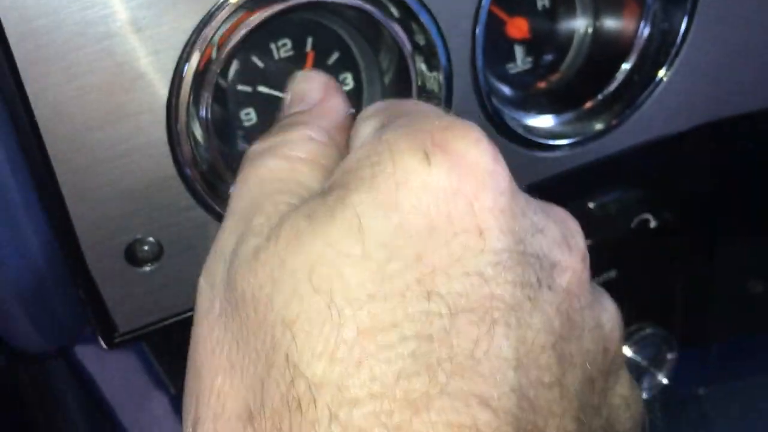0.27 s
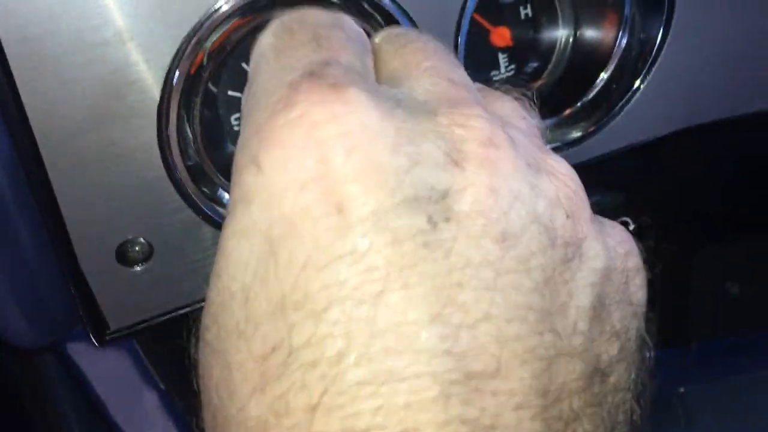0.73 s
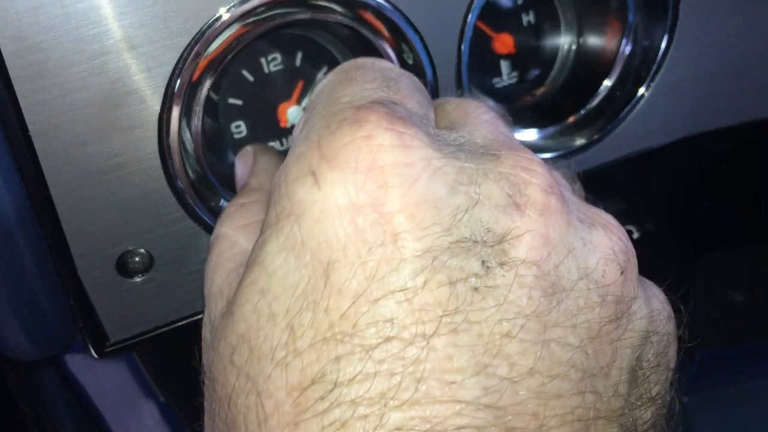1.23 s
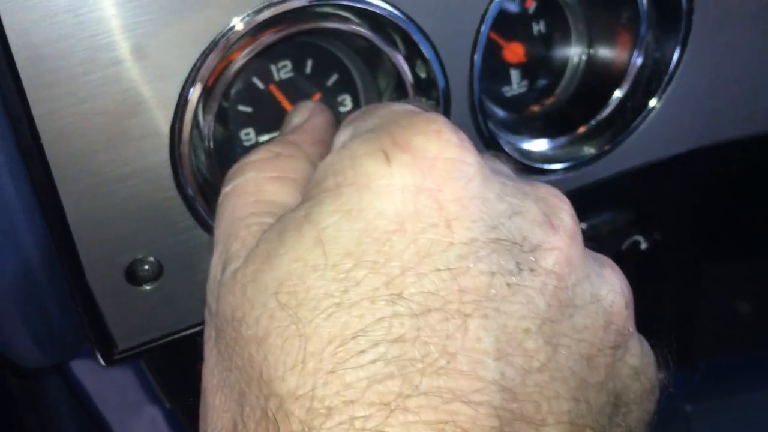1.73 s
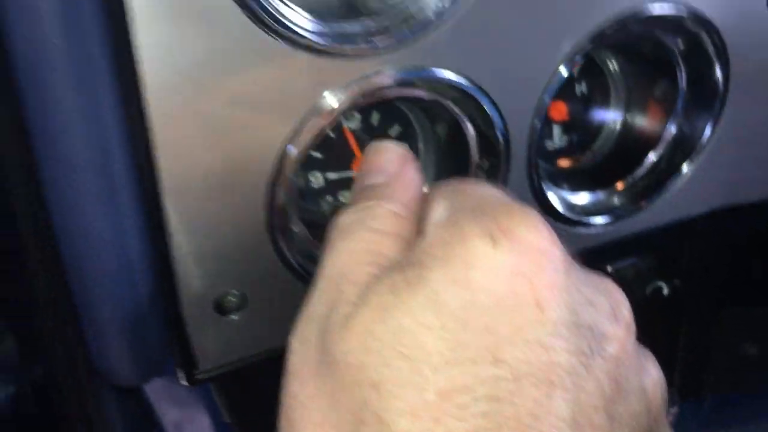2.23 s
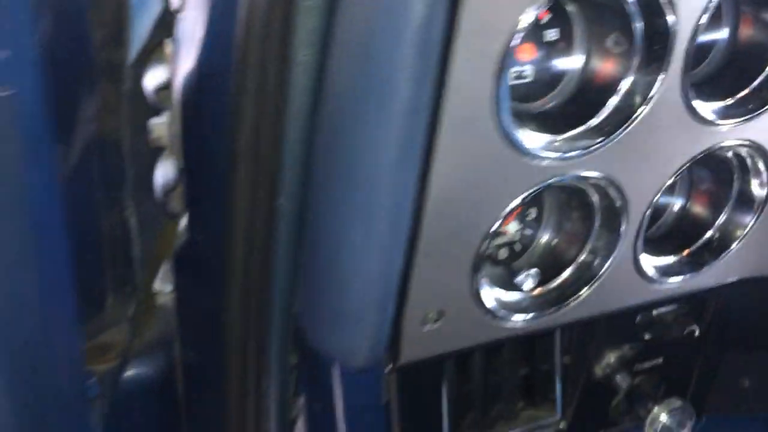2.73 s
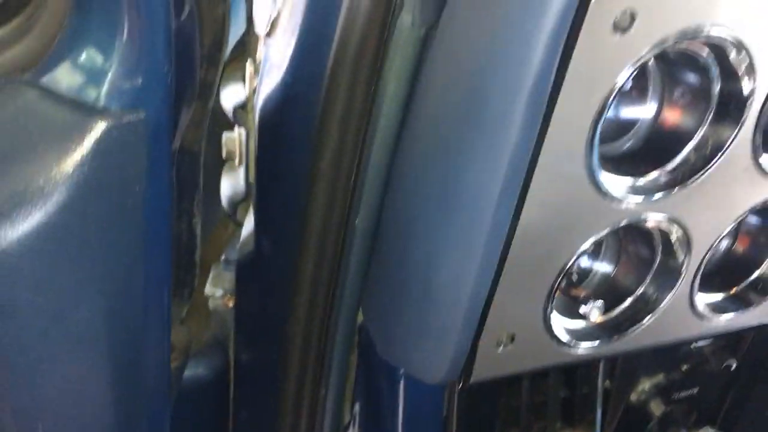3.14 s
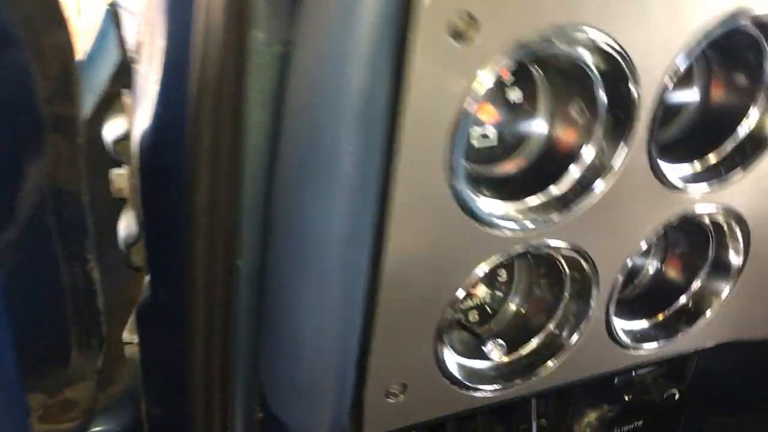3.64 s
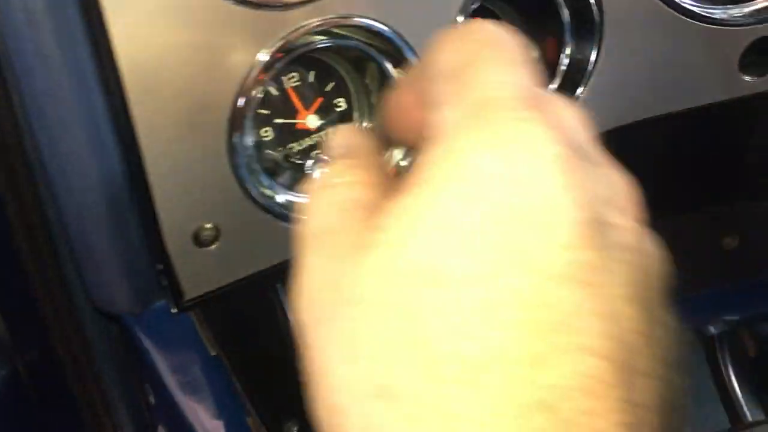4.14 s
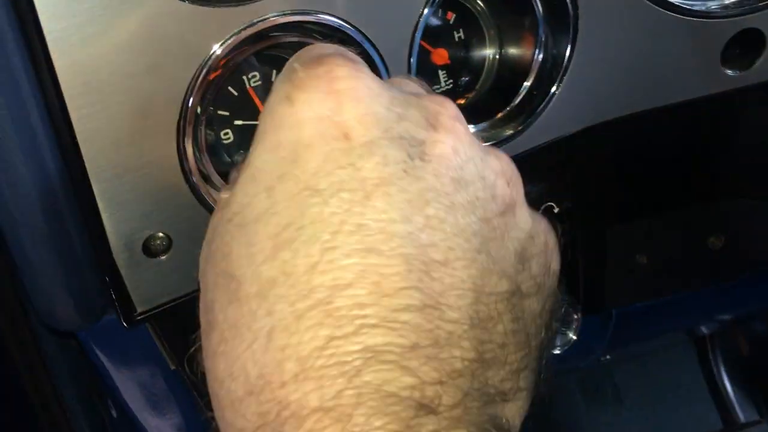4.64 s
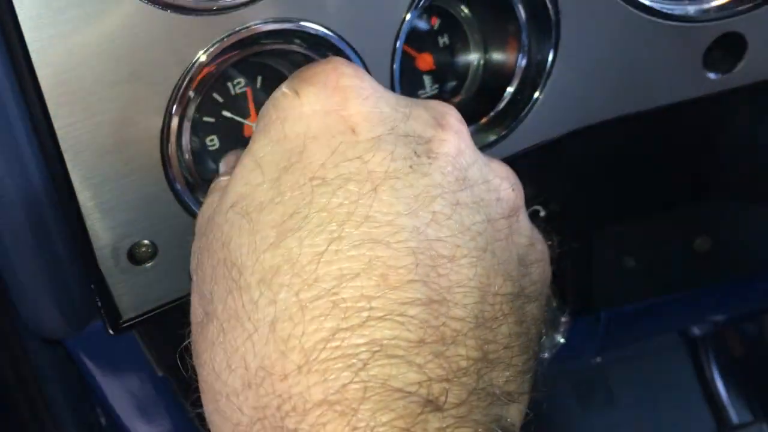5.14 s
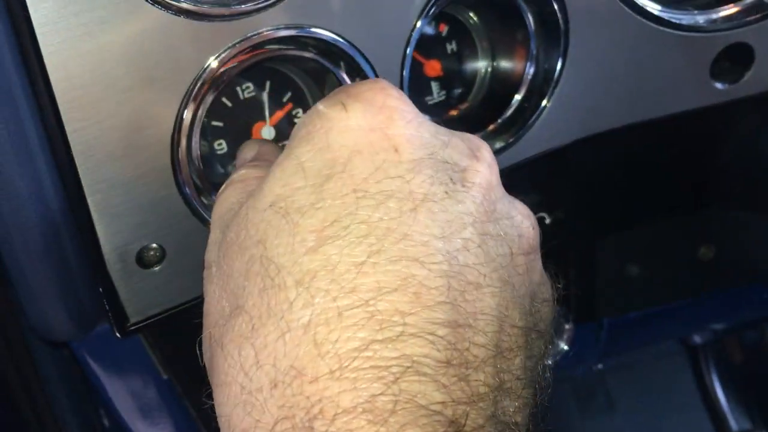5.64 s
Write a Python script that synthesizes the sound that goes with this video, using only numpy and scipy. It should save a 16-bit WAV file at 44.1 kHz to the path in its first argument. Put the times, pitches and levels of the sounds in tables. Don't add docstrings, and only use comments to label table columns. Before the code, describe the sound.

Inside a padded truck cab, a little sprung knob is pulled, turned and released a hand's width from the microphone. Two brutal clipped snaps, about two seconds apart, ring the metal panel and chrome rim, with scratchy twisting between them. Then mostly low rumble, soft hiss and rustling cloth, followed by a cluster of smaller clicks and fading scrapes.

```python
import sys
import numpy as np
from scipy import signal
from scipy.fft import rfft, irfft
from scipy.io import wavfile
from scipy.ndimage import uniform_filter1d

SR = 44100
rng = np.random.default_rng(int(sys.argv[2]) if len(sys.argv) > 2 else 0)


def volts_from_db(level):
    exponent = np.asarray(level, float) / 20
    return 10 ** exponent


def put_to_file(sound):
    columns = np.atleast_2d(sound).T
    safe = np.clip(columns, -1, 1)
    whole_steps = np.round(safe * 32767)
    wavfile.write(sys.argv[1], SR, whole_steps.astype(np.int16))


N = 259749
T = np.arange(N) / SR

# start_s [s], peak_db [dB], treble_db [dB], thud_db [dB], rattle_s [s]
SNAPS = [
    (0.3423, 8, 6.5, -13, 0.002),
    (2.2404, 8, 6, -13, 0.003),
    (4.685, -19, -20, -43.5, 0.0063),
    (4.8263, -14.5, -31.5, -23, 0.018),
    (4.9683, -17, -18.5, -29.5, 0.0092),
]
GRIT_DB = 1.3


def unit(x):
    return x / np.sqrt(np.mean(x ** 2))


def ring(x, modes):
    out = 0
    for k, (hz, db, t60) in enumerate(modes):
        r = np.exp(-np.log(1000) / (max(t60, .002) * SR))
        a = [1, -2 * r * np.cos(2 * np.pi * hz / SR), r * r]
        gain = (-1) ** k * volts_from_db(db) * np.sqrt((1 - r * r) / 2)
        out = out + gain * signal.lfilter([1, 0, -1], a, x)
    return out / np.sqrt(np.sum(volts_from_db([m[1] for m in modes]) ** 2))


def band(x, lo_hz, hi_hz):
    return signal.sosfilt(signal.butter(2, [lo_hz, hi_hz], "band", fs=SR, output="sos"), x)


def steady(x, hold_s):
    return x / np.sqrt(uniform_filter1d(x * x, int(hold_s * SR)) + 0.019)


def grit(spread_db):
    jumps = np.repeat(rng.exponential(size=N // 22 + 1), 22)[:N]
    return unit(rng.standard_normal(N) * volts_from_db(spread_db * jumps))


def judder(depth_db, hold_s):
    k = int(hold_s * SR)
    strength = np.repeat(rng.standard_normal(N // 100), k)[:N]
    return volts_from_db(depth_db * uniform_filter1d(strength, k // 2))


def swell(middle_s, length_s):
    return np.cos(np.pi * np.clip((T - middle_s) / length_s, -.5, .5)) ** 2


def struck(rattle_s, t60):
    t = T[:int(.25 * SR)]
    rise = np.minimum(t / .0003, 1)
    return rise * volts_from_db(-60 * np.maximum(t - rattle_s, 0) / max(t60, .005))


def add(track, start, x):
    track[start:start + len(x)] += x[:len(track) - start]


def cab_air():
    # pitch_hz [Hz], level_db [dB], t60_s [s]
    lengthwise = [(87.5, -7, 0.62), (102.4, 5, 0.87), (120.9, -6, 0.098)]
    crosswise = [(167.9, -2, 0.41), (184, 0, 0.49), (228.8, -10, 0.14)]
    seat_mode = [(41.95, -10, 0.61), (71.6, -12, .3)]
    upper_modes = [(252.4, 1, 0.079), (291.7, 2.5, 0.13), (352.9, -0.5, 0.377), (405, -10, 0.16)]
    # pitch_hz [Hz], level_db [dB], t60_s [s]
    mic_port = [(9600, 0, .002)]
    # pitch_hz [Hz], density_db [dB per Hz]
    hiss_curve = [(200, -18), (300, -11.5), (450, -7), (700, -9), (1200, -11), (2000, -17), (3200, -21.5),
                  (4900, -28), (6000, -25.5), (7800, -27.5), (11000, -28.5), (15400, -29)]
    # at_s [s], lean_db [dB]
    lean = [(0, 0), (.67, -1.5), (1.0, 6), (1.43, 7), (2.0, -6), (2.25, 2.5), (2.55, -4.5), (3.9, -1.5),
            (4.1, -1.5), (4.72, 4), (5.03, 6), (5.25, 1.5), (5.89, -2)]
    # middle_s [s], length_s [s], lengthwise_db [dB], crosswise_db [dB]
    jolts = [(0.01, 0.042, -47, -23.5), (0.388, 0.31, -21, -26.5), (0.601, 0.22, -36, -30),
             (0.715, 0.26, -26.5, -28.5), (0.898, 0.21, -26, -34.5), (1.09, 0.22, -35, -30.5),
             (1.358, 0.33, -34, -32), (1.825, 0.58, -28, -51.5), (2.017, 0.18, -52.5, -32.5),
             (2.316, 0.17, -31.5, -34), (2.518, 0.63, -27, -51), (2.841, .14, -27.5, -37),
             (3.77, 0.47, -24, -51), (4.313, 0.18, -26.5, -34), (4.413, .14, -24.5, -32),
             (4.532, 0.23, -21, -45), (4.647, 0.13, -25.5, -22), (4.779, 0.09, -20.5, -30.5),
             (4.84, 0.098, -32, -17.5), (4.981, 0.5, -20, -26.5), (5.188, 0.45, -27, -27.5),
             (5.401, 0.14, -28.5, -26.5), (5.508, 0.069, -24, -23.5), (5.694, 0.21, -25.5, -36.5),
             (5.826, 0.15, -25, -50.5)]

    lean_db = np.interp(T, *np.transpose(lean))
    long_push = volts_from_db(-33 + 0.11 * lean_db)
    cross_push = volts_from_db(-36.5 + lean_db)
    for middle_s, length_s, long_db, cross_db in jolts:
        push = swell(middle_s, length_s)
        long_push = np.hypot(long_push, volts_from_db(long_db) * push)
        cross_push = np.hypot(cross_push, volts_from_db(cross_db) * push)
    modes = lengthwise, crosswise, seat_mode, upper_modes
    long, cross, seat, upper = (unit(ring(rng.standard_normal(N), m)) for m in modes)
    boom = long_push * steady(long, 0.07) + cross_push * steady(cross, 0.1)
    boom += volts_from_db(-40) * steady(seat, 0.1756) + volts_from_db(-51 + lean_db) * upper

    hz, db = np.transpose(hiss_curve)
    f = np.fft.rfftfreq(N, 1 / SR) + 1
    density = volts_from_db(np.interp(np.log(f), np.log(hz), db, -90, -90))
    hiss = irfft(rfft(rng.standard_normal(N)) * density, N)
    hiss = unit(hiss + volts_from_db(-11) * ring(hiss, mic_port))
    return boom + volts_from_db(-52 + .15 * lean_db) * hiss


def cab_echo(near):
    t60_s, level_db = 0.14, -25
    t = T[:int(.2 * SR)]
    tail = rng.standard_normal(len(t)) * volts_from_db(-60 * t / t60_s) * (t > .003)
    return volts_from_db(level_db) * signal.fftconvolve(near, tail / np.sqrt(np.sum(tail ** 2)))[:N]


def rustle():
    # middle_s [s], length_s [s], level_db [dB], pitch_hz [Hz]
    rustles = [(1.91, 0.28, -69, 3040), (2.62, 0.43, -71, 7000), (2.64, 0.39, -72, 3330),
               (2.93, 0.29, -70.5, 3000), (2.92, 0.15, -62, 1720), (3.7, 0.53, -66, 3170),
               (3.68, 0.33, -70.5, 5670), (3.3, .15, -72, 6900), (3.75, 0.28, -71.5, 4330),
               (4.06, 0.63, -80, 3260), (4.58, .25, -68.5, 2900), (5.65, .2, -72, 4150)]
    cloth = grit(GRIT_DB) * judder(1.9, .02)
    out = np.zeros(N)
    for middle_s, length_s, db, hz in rustles:
        out += volts_from_db(db + 6) * swell(middle_s, length_s) * ring(cloth, [(hz, 0, .014)])
    return out


def pings():
    # start_s [s], level_db [dB], pitch_hz
    # [Hz], t60_s [s]
    parts = [(.254, -40, 8560, .021), (.342, -12.5, 9100, 0.038), (.791, -38.5, 2660, 0.039),
             (0.91, -26, 1394, 0.05), (.997, -29, 2090, 0.038), (.997, -42, 4170, .033),
             (.997, -33.5, 6200, .035), (1.101, -25, 1347, .046), (1.114, -30, 1610, .051),
             (1.211, -23, 2450, .043), (1.215, -25.5, 1330, 0.087), (1.241, -22, 2430, .06),
             (1.755, -34.5, 926, 0.07), (3.901, -54.5, 5140, .09), (4.099, -45.5, 1654, 0.12),
             (4.688, -30, 3510, 0.042), (4.689, -29, 2010, 0.033), (.343, -14, 1287, .05),
             (4.831, -17.5, 56, .15), (4.971, -20, 6230, 0.04), (5.138, -25.5, 1615, 0.11),
             (5.252, -30.5, 1370, 0.074), (5.356, -38.5, 1346, 0.056), (5.44, -52.5, 3470, 0.069),
             (5.541, -41, 1385, 0.053), (5.812, -45.5, 1700, 0.04)]
    # pitch_hz [Hz], level_db [dB], t60_s [s]
    case_modes = [(367.3, -0.5, 0.14), (1040, 3, 0.0587), (1304, -5, 0.042), (575, -6.5, 0.049)]
    out, t = np.zeros(N), T[:int(.2 * SR)]
    case = [(s + .002, thud_db + db, hz, t60) for s, _, _, thud_db, _ in SNAPS for hz, db, t60 in case_modes]
    for s, db, hz, t60 in parts + case:
        fade = np.minimum(t / 0.002216, 1) * volts_from_db(db - 60 * t / t60)
        add(out, int(s * SR), fade * np.sin(2 * np.pi * hz * t))
    return out


def twists():
    # start_s [s], length_s [s], first_db [dB], last_db [dB], treble_db [dB against these]
    strokes = [(0, 0.095, -28.5, -47.5, -15.5), (0.088, 0.13, -30, -58, -22),
               (0.742, 0.037, -49.5, -49.5, -16), (.775, 0.1, -36.5, -32.5, -8),
               (1.073, 0.1, -38, -30, -17), (1.172, 0.085, -32, -32, -9), (1.262, .25, -29.5, -41, -15),
               (1.501, 0.23, -33, -45, -17), (1.728, 0.06, -33, -36, -11), (4.889, .06, -42, -44, -32),
               (5.221, 0.095, -38.5, -50, -27.5), (5.34, 0.059, -44, -58, -24),
               (5.426, .06, -38.5, -44, -25), (5.476, 0.096, -48, -43, -23), (5.6, 0.16, -45, -44, -18.5),
               (5.796, 0.057, -46.5, -49.5, -12)]
    grip_s = .022
    grip, skid = judder(2.5, .012), judder(2.6, .005)
    rub, high = np.zeros((2, N))
    for s, length_s, first_db, last_db, treble_db in strokes:
        edge_s = np.minimum(T - s, s + length_s - T)
        held = np.clip(edge_s / grip_s + .5, 0, 1) ** 2
        force = held * volts_from_db(np.interp(T, [s, s + length_s], [first_db, last_db]) - 6)
        rub += grip * force
        high += np.sqrt(grip) * skid * force * volts_from_db(treble_db)
    return rub, high


def touches():
    # start_s [s], peak_db [dB], treble_db [dB], ring_hz [Hz],
    # t60_s [s]
    light_contacts = [
        (0.298, -34.5, -33, 1290, .03),
        (.308, -24, -28, 1230, 0.061),
        (2.22, -33, -39.5, 1278, 0.12),
        (4.8104, -26, -25, 3600, 0.0044),
        (0.859, -28, -13, 1500, 0.0053),
        (4.835, -26, -19, 970, 0.033),
                      (0.214, -31.5, -30.5, 1250, 0.034), (0.252, -55, -48, 1060, 0.032),
             (0.529, -53.5, -52, 1040, 0.03), (0.542, -42.5, -48, 1560, 0.035),
             (0.58, -57, -44, 1040, 0.02), (0.981, -30, -38, 1560, 0.039), (0.999, -38, -54, 2000, 0.1),
             (1.159, -45, -37, 1340, 0.025), (1.958, -39.5, -59, 1680, 0.042),
             (2.024, -32, -44, 1293, 0.096), (2.179, -34, -38, 1650, 0.063), (2.2, -37, -40, 1500, 0.02),
             (3.093, -39, -61, 2220, 0.17), (4.094, -37.5, -53.5, 2160, 0.15),
             (4.405, -28, -60.5, 1870, 0.038), (4.491, -38.5, -57, 1890, 0.039),
             (4.534, -37.5, -44.5, 2110, 0.03), (4.855, -21, -26.5, 1810, 0.049),
             (5.04, -26.5, -39, 1660, 0.14), (5.352, -44, -59.5, 1320, 0.06)]
    # start_s [s], peak_db [dB], treble_db [dB], ring_hz [Hz], length_s [s]
    scrapes = [(0.0, -45.5, -32.5, 1690, 0.0094), (0.028, -32.5, -55, 1310, 0.04),
               (0.045, -46, -38, 1240, 0.03), (0.055, -32.5, -40, 1400, 0.025),
               (0.102, -26, -30.5, 1320, 0.015), (0.134, -33.5, -42, 1400, 0.024),
               (0.895, -24.5, -41, 1490, 0.037), (0.919, -29.5, -47, 1340, 0.032),
               (1.088, -32.5, -57, 1355, 0.077), (1.176, -24.5, -36, 1360, 0.044),
               (1.207, -24.5, -33.5, 2350, 0.077), (1.517, -35, -58, 1280, 0.028),
               (1.592, -28.5, -48, 1230, 0.017), (1.664, -39, -41.5, 1263, 0.02),
               (1.736, -39, -39.5, 1620, 0.033), (5.057, -30, -45, 1150, 0.016),
               (5.122, -22.5, -33.5, 1540, 0.056), (5.164, -25.5, -40, 1320, 0.034),
               (5.254, -36, -54, 1344, 0.03), (5.427, -41.5, -53, 1460, 0.031),
               (5.542, -44.5, -48, 1330, 0.016), (5.68, -37.5, -53, 1350, 0.064),
               (5.815, -39, -50, 1340, 0.02)]
    rattle_share = .09
    creep_s, creep_db, creep_hz = .0095, -24, 1245

    events = []
    for s, db, treble_db, hz, t60 in light_contacts:
        events.append((int(s * SR), struck(rattle_share * t60, t60), db, treble_db, hz))
    for s, db, treble_db, hz, length_s in scrapes:
        shape = np.sqrt(np.hanning(int(max(length_s, .005) * SR)))
        events.append((int(s * SR), shape, db, treble_db, hz))
    creep = np.sqrt(np.linspace(0, 1, int(creep_s * SR)))
    for s, db, treble_db, *_ in SNAPS:
        events.append((int(s * SR) - len(creep), creep, db + creep_db, treble_db + creep_db, creep_hz))

    low, high, own = np.zeros((3, N))
    rough = grit(GRIT_DB)
    for i, shape, db, treble_db, hz in events:
        add(low, i, volts_from_db(db - 12) * shape)
        add(high, i, volts_from_db(treble_db - 13) * shape)
        force = np.r_[shape * np.resize(rough[i:], len(shape)), np.zeros(2000)]
        add(own, i, volts_from_db(db - 13) * ring(force, [(hz, 0, .025), (1.45 * hz, -9, .015)]))
    return low, high, own


def snaps():
    first_blow_db, first_blow_s, t60_s = 6, .0017, .084
    low, high, thud = np.zeros((3, N))
    for s, db, treble_db, thud_db, rattle_s in SNAPS:
        i, shape = int(s * SR), struck(rattle_s, t60_s)
        shape = shape * (1 + volts_from_db(first_blow_db) * np.exp(-T[:len(shape)] / first_blow_s))
        shape = shape * judder(2.5, .0026)[:len(shape)]
        add(low, i, volts_from_db(db - 16.0) * shape)
        add(high, i, volts_from_db(treble_db - 16.5) * shape ** 1.41)
        add(thud, i, volts_from_db(thud_db) * shape ** 0.55)
    return low, high, thud


def knob():
    # pitch_hz [Hz], level_db [dB], t60_s [s]
    panel_modes = [(607, -2.5, 0.035), (865.5, 3, 0.021), (1027, 4.5, 0.031), (1263, 10.5, 0.016),
                   (1620, 3, 0.052), (1890, 6.5, 0.019), (2167, 3.5, 0.011), (2450, 0, 0.066),
                   (2912, -32.5, 0.069), (3542, -7.5, 0.038)]
    bezel_modes = [(4280, -2, 0.022), (5320, 1, .03), (5910, 2, 0.026), (6400, 8, 0.021),
                   (6870, -1.5, 0.029), (8200, 6, .03), (9100, 6, .025), (9620, 5, 0.025),
                   (10580, -34, 0.056), (11470, 2.5, .03), (12500, -0.5, 0.015), (13900, -1, 0.016)]
    carcass_modes = [(104, 2, .15), (185, 3.5, 0.058), (304, -3.5, 0.1), (383.4, 3.5, 0.028),
                     (423, -6, 0.026), (574, -3, 0.0656)]

    snap_low, snap_high, thud = snaps()
    touch_low, touch_high, own = touches()
    rub, skid = twists()
    low = (snap_low + touch_low) * grit(GRIT_DB)
    high = (snap_high + touch_high + skid) * grit(GRIT_DB)
    rub = rub * grit(GRIT_DB)
    knock = thud * rng.standard_normal(N)

    panel = ring(low + rub, panel_modes) + volts_from_db(2.5) * band(low, 900, 4500)
    skin = volts_from_db(4.5) * band(band(rub, 690, 3000), 690, 3000)
    bezel = ring(high, bezel_modes) + volts_from_db(6) * band(high, 4900, 16500)
    carcass = ring(knock, carcass_modes) + volts_from_db(4.5) * band(knock, 180, 640)
    return panel + skin + bezel + own + pings() + carcass


def scene():
    near = knob()
    return (near + cab_echo(near) + rustle() + cab_air())[None]


def low_pass(x):
    return signal.sosfilt(signal.butter(12, 15420, fs=SR, output="sos"), x)


def record(dry):
    top = signal.ellip(7, .5, 40, 14950, fs=SR, output="sos")
    mix = signal.sosfilt(top, np.clip(dry, -1, 1))
    return low_pass(np.clip(mix, -1, 1))


dry = scene()
out = record(dry)
put_to_file(out)
```